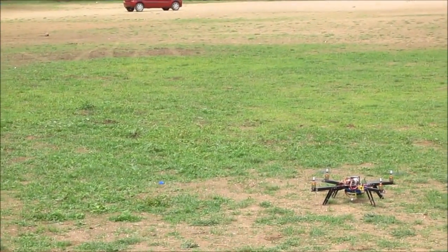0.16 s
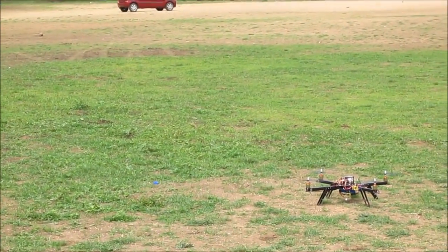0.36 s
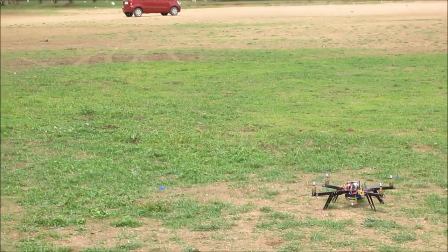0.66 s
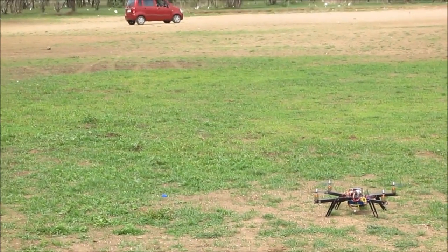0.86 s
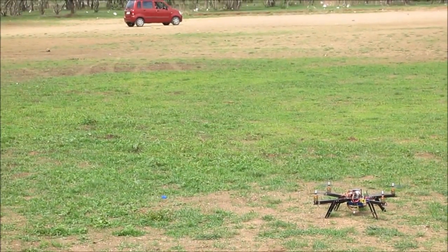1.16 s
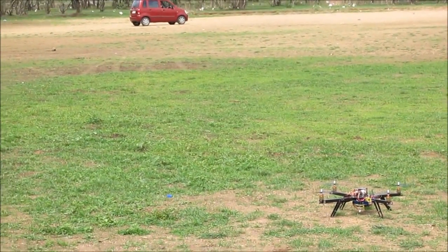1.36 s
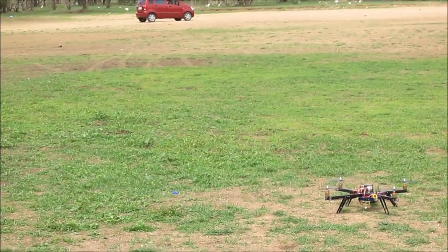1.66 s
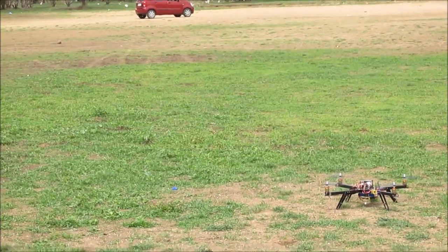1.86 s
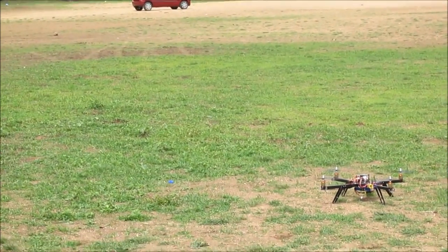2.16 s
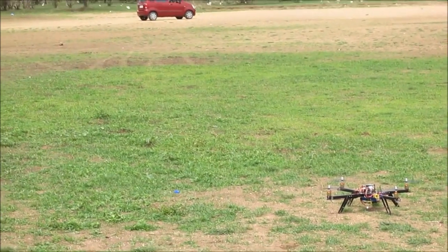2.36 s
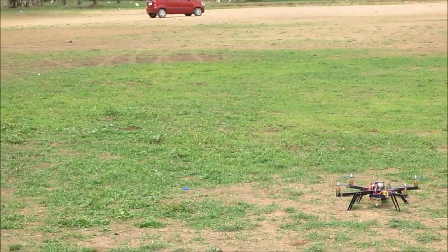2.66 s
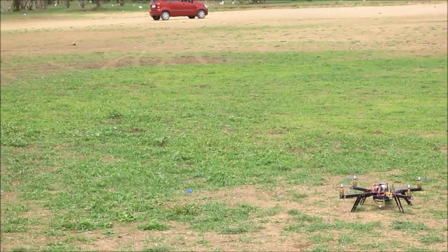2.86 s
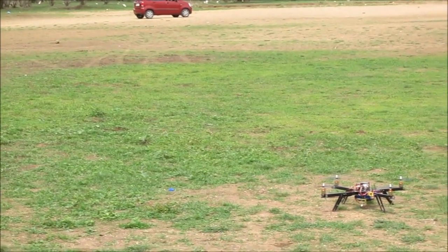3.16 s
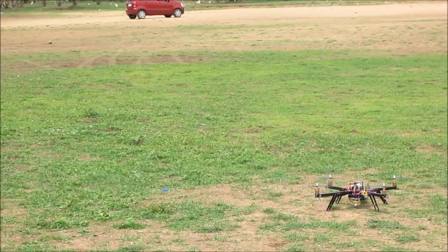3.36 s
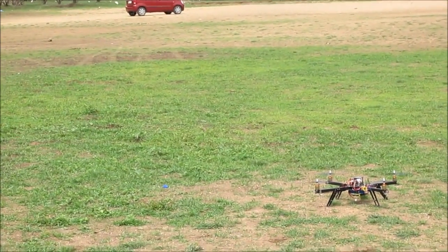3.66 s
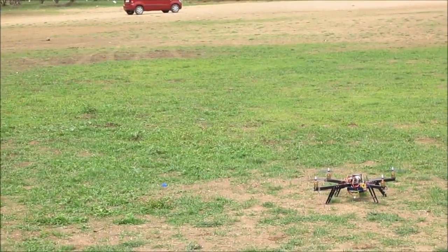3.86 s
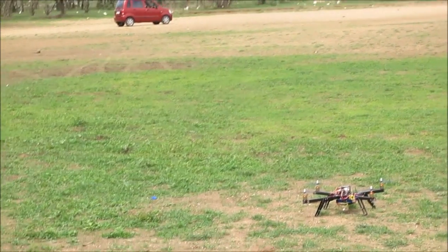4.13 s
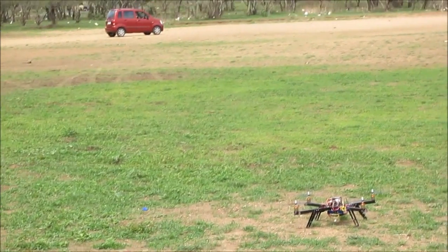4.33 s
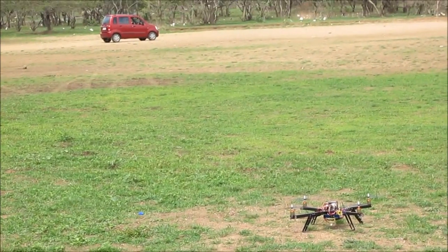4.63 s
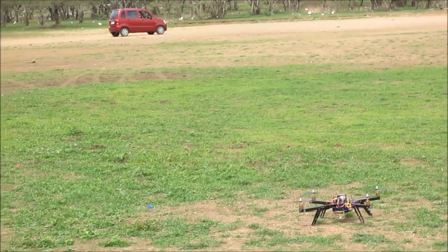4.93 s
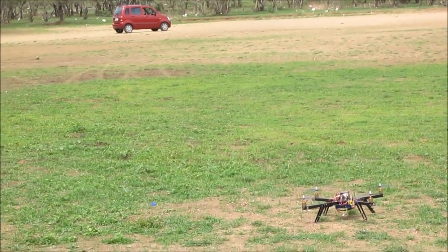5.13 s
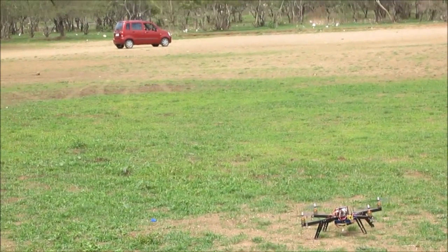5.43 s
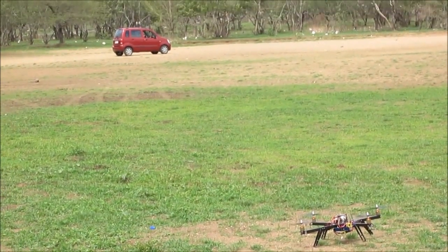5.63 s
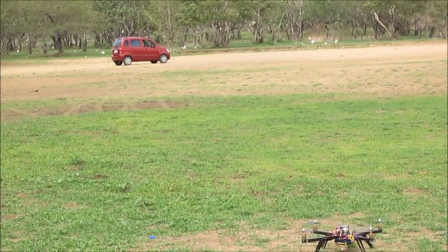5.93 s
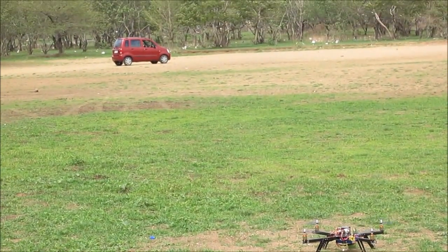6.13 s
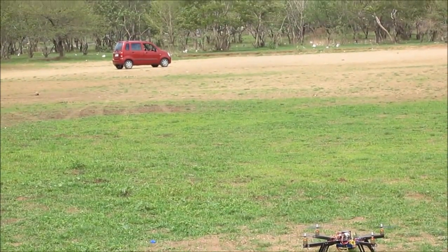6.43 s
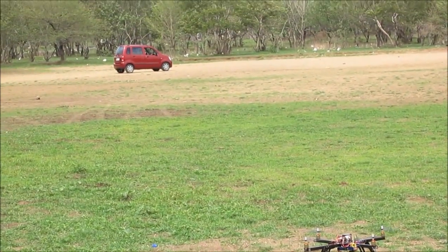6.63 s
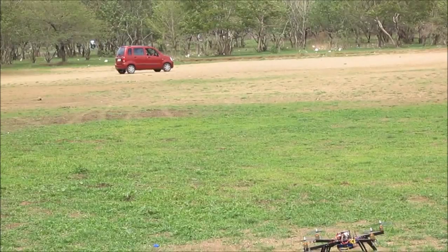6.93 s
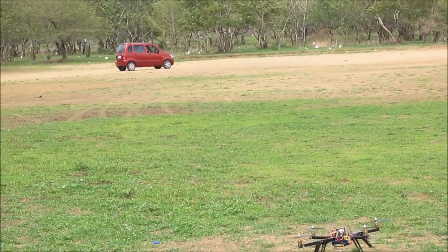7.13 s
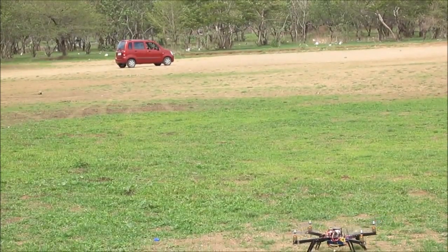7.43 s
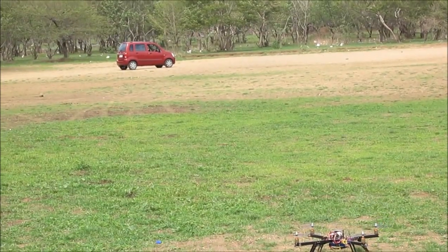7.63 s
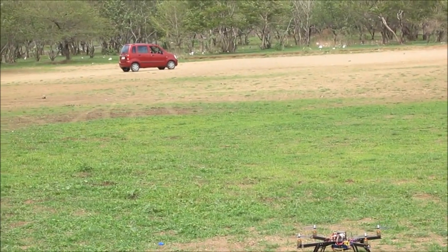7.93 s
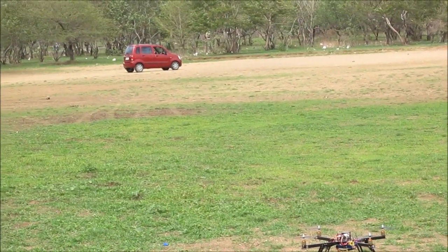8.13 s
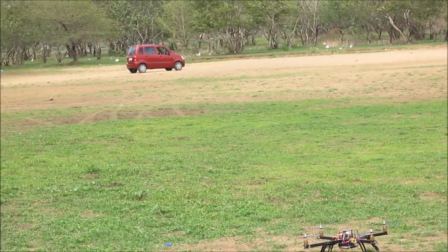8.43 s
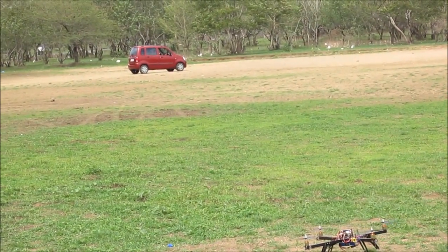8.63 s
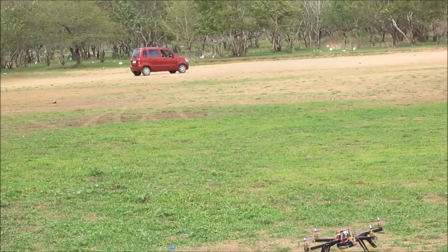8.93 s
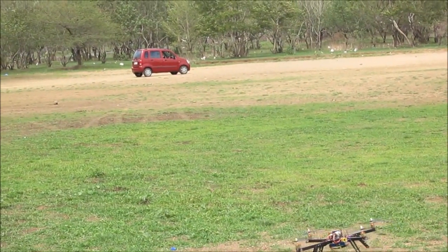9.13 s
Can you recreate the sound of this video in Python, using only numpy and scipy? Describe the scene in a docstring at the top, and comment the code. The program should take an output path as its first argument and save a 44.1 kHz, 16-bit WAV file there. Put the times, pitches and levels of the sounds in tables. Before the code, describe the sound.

In an open field, a small drone sits spinning its motors. Two thin high whines, not quite in tune, climb slowly over soft propeller hiss and a faint steadier higher electronic tone. They strengthen midway, waver, dip sharply late, then surge upward again. Wind hits the unshielded stereo microphone throughout, with deep uneven thumps, flutter and sharp little pops, heaviest in the first two seconds.

```python
"""Two brushless motors of a small multirotor whine at their commutation rate as they spin up on open grass.
Sine tones follow their pitch curves, mixed with the switching tone of the speed controllers, over propeller hiss
made of coloured noise. Gusts of low noise and kicks buffet two microphone ports, and short chirps pop on them.
Two faint low tones, airy swells and a brief treble rasp fill in; a gain control ducks after the loudest."""
import sys
import numpy as np
from scipy import signal
from scipy.fft import rfft, irfft, next_fast_len
from scipy.io import wavfile
from scipy.ndimage import uniform_filter1d

SR = 44100
rng = np.random.default_rng(int(sys.argv[2]) if len(sys.argv) > 2 else 0)


def file_out(sig):
    """Save sig as 16-bit WAV at sys.argv[1]."""
    # one column per channel
    cols = np.atleast_2d(sig).T
    # limit, then scale
    lim = np.clip(cols, -1, 1)
    pcm = np.round(lim * 32767).astype(np.int16)
    wavfile.write(sys.argv[1], SR, pcm)


N = 409644

# Motor pitch curves. Each row: time in seconds, commutation rate in Hz (before jitter).
NEAR_PITCH = [(0, 2740), (.5, 2847), (1.48, 2972), (2.01, 3015), (2.3, 2985), (2.72, 3030), (3.05, 3090),
              (3.2, 3160), (3.33, 3172), (3.47, 3110), (3.7, 3205), (3.97, 3161), (4.146, 3104),
              (4.24, 3165), (4.43, 3185), (4.78, 3273), (4.9, 3220), (5.05, 3198), (5.25, 3326),
              (5.58, 3153), (5.84, 3295), (6.02, 3100), (6.12, 3215), (6.18, 3065), (6.256, 3026),
              (6.42, 3250), (6.59, 3377), (6.735, 3406), (6.93, 3302), (7.05, 3272), (7.19, 3555),
              (7.25, 3490), (7.338, 3130), (7.423, 2743), (7.473, 2820), (7.518, 2680), (7.575, 2800),
              (7.6, 2950), (7.62, 2865), (7.722, 2843), (7.837, 3020), (8.196, 3248), (8.33, 3212),
              (8.57, 3189), (8.71, 3148), (8.9, 3360), (8.97, 3300), (9.03, 3390), (9.08, 3315),
              (9.21, 3545), (9.289, 3394)]
FAR_PITCH = [(0, 2351), (.92, 2502), (2.44, 2544), (2.69, 2620), (2.784, 2602), (3.13, 2700), (3.58, 2745),
             (3.88, 2758), (4.45, 2850), (4.67, 2797), (5.03, 2895), (5.51, 3010), (5.74, 3120),
             (5.85, 3110), (6.13, 2498), (6.575, 2910), (6.93, 3272), (7.11, 3360), (7.215, 3125),
             (7.303, 3227), (7.5, 2290), (7.6, 2280), (7.82, 2430), (8.12, 2701), (8.625, 2926),
             (8.98, 3398), (9.03, 3464), (9.08, 3470), (9.21, 3280), (9.289, 3384)]
# Pitch of the speed controllers' switching. Each row: time in seconds, frequency in Hz.
SWITCHING_PITCH = [(0, 7765), (1.4, 7759), (5.9, 7750), (6.15, 7762), (7.3, 7746), (7.55, 7768),
                   (9.29, 7742)]
# Level of the switching tone, beating slowly. Each row: time in seconds, level in dB before flicker.
SWITCHING_LEVEL = [(0, -45), (.28, -57.5), (1.35, -51), (1.84, -53), (2.21, -45), (2.63, -50.5),
                   (3.4, -41.5), (3.97, -50), (5.2, -50), (6.5, -41), (7.23, -49), (7.72, -38), (8.2, -42),
                   (8.39, -34.5), (8.69, -52), (8.86, -41), (9.28, -52)]
# Side tones of a motor. Each row: multiple of switching, multiple of the electrical rate (commutation / 6).
SIDE_TONES = [(0, 7), (0, 8), (0, 9), (0, 12), (0, 18), (1, -9), (1, -8), (1, -7), (1, -6), (1, -2), (1, 2),
              (1, 6)]
# Side tone levels, one for each row above: level in dB before load, frame and flicker.
NEAR_SIDE_DB = [-57.5, -56.5, -52, -63, -65, -54.5, -76, -65, -47.5, -59, -55.5, -59]
FAR_SIDE_DB = [-60, -76, -56.5, -55, -74, -57, -61, -55.5, -54, -64, -55, -53.5]
# How the frame radiates the side tones. Each row: frequency in Hz, gain in dB.
FRAME_GAIN = [(2800, -12), (3300, 2), (3600, -4.5), (3820, 5), (4050, 7), (4300, -1.5), (4550, -3.5),
              (4750, -14.5), (5500, -4), (6500, 1), (8800, 0), (10200, -6.5), (11100, 0)]
# The motor bell rings where the whine is loudest. Each row: whine in Hz, level in dB before trim and load.
BELL_RING = [(2300, -60), (2550, -44.5), (2750, -44), (2950, -45), (3080, -37.5), (3170, -31),
             (3240, -30.5), (3320, -36.5), (3420, -37.5), (3550, -41.5)]
# Motor load, heard as hiss. Each row: time in seconds, level in dB (each use adds its own offset).
LOAD_HISS = [(0, -53.5), (.5, -50), (1.6, -49), (2.1, -46.5), (2.6, -50), (3.03, -49.5), (4.2, -42),
             (5, -43), (5.3, -40.5), (6.2, -42), (6.7, -40.5), (7.2, -41.5), (7.35, -43), (8, -40.5),
             (8.6, -41), (8.92, -40), (9.289, -39)]
# Colour of the blade hiss. Each row: frequency in Hz, relative density in dB per Hz.
BLADE_COLOUR = [(180, -26), (300, -4.5), (470, -6.5), (900, -3.5), (2400, -5.5), (3200, -4), (3600, -5.5),
                (4000, -5.5), (5840, -9), (7500, -8), (8990, -3.5), (11000, -10), (13600, -17),
                (15800, -27)]
# Top of the hiss over its usual colour. Each row: time in seconds, gain in dB before wavering.
HISS_TOP = [(0, -1), (.3, -5), (.6, -3), (2.2, -2), (3.03, 8), (3.5, 3), (4.2, -0.5), (7.2, -1), (7.4, -6),
            (7.6, -7), (7.95, -5), (8.63, -3.5), (8.92, 1.5), (9.289, -2.5)]
# How far the top gain reaches down. Each row: frequency in Hz, share (held level beyond both ends).
TOP_REACH = [(8000, 0.26), (13000, 1)]
# Wind between the gusts. Each row: time in seconds, rumble level in dB before wavering.
BREEZE_LEVEL = [(0, -42), (.35, -39), (.95, -29), (1.15, -50), (1.5, -44), (1.62, -29.5), (1.85, -22),
                (2.05, -26), (2.2, -47), (2.33, -47), (2.5, -34.5), (2.8, -35), (3, -53), (3.9, -32),
                (4.35, -37.5), (4.65, -29), (5, -33), (5.5, -38.5), (5.85, -29), (6.08, -30), (6.22, -39.5),
                (6.42, -49.5), (6.65, -29), (7, -35.5), (7.68, -35), (8.3, -33.5), (8.7, -36.5),
                (9.289, -33)]
# Gusts. Each row: peak time in seconds, nominal rumble level in dB, width in seconds, flutter over rumble in dB.
GUST_EVENTS = [(0.034, -33, 0.012, 2.5), (.244, -36, 0.066, -0.5), (.43, -25, 0.095, -8.5),
               (.52, -20, 0.017, 5.5), (0.767, -29.5, 0.057, 1), (1.162, -35.5, 0.021, -9),
               (1.297, -35.5, 0.047, -5.5), (1.416, -27, 0.037, -13), (1.692, -15.5, 0.053, -0.5),
               (1.905, -20, 0.095, 0), (2.25, -41, 0.029, -24), (2.365, -23.5, 0.016, -6.5),
               (2.444, -25, 0.038, -6.5), (2.73, -31, 0.025, -8), (3.02, -32.5, 0.027, -27.5),
               (3.153, -24, 0.055, -13.5), (3.4, -28, 0.14, -13), (3.557, -22.5, 0.036, -6.5),
               (3.826, -22.5, 0.049, -13.5), (4.069, -26.5, 0.018, -24), (4.141, -21, 0.016, 4.5),
               (4.265, -25, .06, -21), (4.55, -19, 0.11, -8.5), (4.849, -18.5, 0.048, -6.5),
               (5.42, -27.5, 0.063, -17), (5.61, -29.5, .06, -19), (5.918, -14.5, 0.04, -2),
               (5.98, -21.5, 0.089, -12), (6.14, -29, 0.036, -13), (6.5, -29, 0.057, -13),
               (6.62, -26, 0.083, -23), (6.75, -26, 0.069, -10.5), (6.84, -33, 0.047, -14),
               (7.1, -30, 0.12, -14), (7.33, -32.5, .05, -9), (7.458, -31.5, 0.06, -10),
               (7.88, -24, 0.066, -11.5), (8.08, -26, 0.07, -11), (8.43, -22.5, .12, -22),
               (8.58, -24.5, 0.055, -14), (8.77, -33, 0.11, -19)]
# Colours of breeze rumble, gust body and flutter. Each row: frequency in Hz, relative level in dB
# (per Hz for the noises; for the flutter, a filter gain on the kicks).
RUMBLE_COLOUR = [(12, -47), (20, -20), (65, 3), (123, 5.5), (232, -3.5), (276, -15.5), (500, -32),
                 (650, -39), (1100, -120)]
THUMP_COLOUR = [(20, -18), (60, 0.5), (110, 5), (170, 3), (260, -4.5), (400, -19), (650, -55), (1100, -120)]
FLUTTER_COLOUR = [(150, -6), (280, 0), (450, -7.5), (800, -15), (1400, -29), (2500, -53)]
# Pops. Each row: onset in seconds, nominal level in dB before a 2.5 dB lift, starting pitch in Hz,
# crack over the cycles in dB before a 2.5 dB lift of its own, pan in dB added left and taken off right.
POP_EVENTS = [(0.142, -31.5, 1420, -1, -3), (0.436, -26, 655, -17, 9), (0.496, -20, 587, -22, 4),
              (0.518, -13, 850, -7, -7), (0.761, -14.5, 660, -7.5, 8), (0.966, -27.5, 505, -8.5, 6),
              (1.682, -12, 505, -19.5, -11), (1.791, -13, 684, -15, 7), (1.904, -6.5, 602, -12.5, -11.0),
              (1.949, -13, 488, -26, 2.5), (2.362, -34.5, 580, -22, 15), (3.558, -28, 700, -18, -8),
              (3.673, -27, 960, 3, -3.5), (4.134, -28, 510, -15, 1.5), (4.25, -27.5, 1034, -4, -5.5),
              (4.794, -21, 844, -16, -5), (4.84, -22.5, 519, -22.5, 15.5), (5.144, -35.5, 888, 9, -3.5),
              (5.905, -16.5, 540, -14, 14), (6.754, -22, 512, -18, 2)]
# Colour of the crack. Each row: frequency in Hz, relative level in dB per Hz.
CRACK_COLOUR = [(500, -16), (1000, 6.0), (1800, -8.0), (3000, -48.0), (5000, -50)]
# Wind fed across by the stereo circuit. Each row: frequency in Hz, share in the other channel (negative inverts).
PORT_CROSSFEED = [(50, 0.4), (90, .42), (170, 0.53), (350, 0.39), (700, -0.15), (1400, -0.1), (2500, 0.56)]
# Two faint low tones, perhaps the other motors; a list for each. Each row: time in seconds, pitch in Hz,
# level in dB, the last two before wavering.
LOW_TONES = [
    [(.6, 895, -77), (.9, 920, -63), (2.4, 892, -58), (3.2, 964, -74), (3.5, 965, -77)],
    [(2, 840, -81), (2.6, 876, -64), (3.4, 886, -58), (4.15, 869, -53), (5.4, 880, -56), (6, 869, -57),
     (6.8, 889, -51), (7.2, 874, -57), (8.2, 897, -57), (8.7, 882, -52.5), (9.29, 854, -56)],
]
# Soft airy swells in the midrange. Each row: time in seconds, level in dB.
AIRY_LEVEL = [(.8, -54), (1.1, -44.5), (1.6, -47), (2.2, -54), (8.9, -51), (9.15, -44), (9.29, -47)]
# Colour of those swells. Each row: frequency in Hz, relative level in dB per Hz.
AIRY_COLOUR = [(700, -11), (1300, 3.5), (1900, 5), (2600, -23)]
# A brief buzzing rasp in the treble. Each row: time in seconds, level in dB before chopping.
RASP_LEVEL = [(2.82, -56), (2.97, -41), (3.12, -47), (3.3, -44), (3.42, -54)]
# Bands of the rasp. Each row: centre in Hz, width in Hz, relative level in dB.
RASP_COLOUR = [(9650, 450, 0), (10900, 350, -4), (12250, 300, -4)]

WHINE_GROWS = 0.97  # dB of whine per dB of load
COAST_DB, COAST_HZ_PER_S = 8.5, 5100  # deepest fade of a whine as its motor coasts down; pitch slope that nears it
BREEZE_FLUTTER_DB, FLUTTER_GROWS = -12, 0.52  # over rumble at -37 dB; dB more per dB of breeze (stretched later)
GUST_RISE = 0.89  # a gust's rise time over its fall time
DUCK_OVER_DB, DUCK_SHARE, DUCK_MOST_DB = -8, 0.54, 5  # peak threshold; share of the excess taken off; limit
RECOVER_DB_PER_S = 8
TOP_HZ = 15790  # band limit


def amp(db):
    """Decibels to gain."""
    return 10 ** (np.asarray(db) / 20)


def unit(x):
    """Scale to rms 1."""
    return x / np.sqrt(np.mean(x ** 2) + 1e-20)


def along(points, hz):
    """Read (Hz, value) points on a log frequency axis, held level beyond the ends."""
    f, v = np.transpose(points)
    return np.interp(np.log(hz + 1), np.log(f + 1), v)


def curves(rows):
    """One value per sample for each column after the time."""
    s, *cols = np.transpose(rows)
    return [np.interp(np.arange(N) / SR, s, c) for c in cols]


def wobble(rate):
    """A random curve through rate knots a second, each of standard deviation 1."""
    knots = rng.standard_normal(int(N * rate / SR) + 2)
    return np.interp(np.arange(N) * rate / SR, np.arange(len(knots)), knots)


def filtered(x, response):
    """Filter x by a response given as a function of frequency."""
    m = next_fast_len(N + 8192)
    return irfft(rfft(x, m) * response(np.fft.rfftfreq(m, 1 / SR)), m)[..., :N]


def noise(spectrum, channels):
    """Coloured noise of rms 1."""
    white = rng.standard_normal((channels, N))
    return unit(filtered(white, lambda hz: amp(along(spectrum, hz))))


def tone(hz):
    """A sine of rms 1 that follows a pitch curve from a random phase."""
    return np.sqrt(2) * np.sin(2 * np.pi * (np.cumsum(hz) / SR + rng.random()))


def motor(rows, whine_db, side_db, overtones_grow, jitter_hz, flicker_db):
    """Six commutations per electrical turn shake the bell; the switching folds the harmonics around itself."""
    hz = uniform_filter1d(curves(rows)[0], size=500)
    switching_hz = curves(SWITCHING_PITCH)[0]
    load_db = curves(LOAD_HISS)[0] + 47
    # drive runs from -1 (coasting down) to 1 (driven up); the whine fades far more than it swells
    drive = np.tanh(uniform_filter1d(np.gradient(hz) * SR, size=1200) / COAST_HZ_PER_S)
    coast_db = COAST_DB * np.where(drive < 0, drive, 0.13 * drive)
    level_db = whine_db + along(BELL_RING, hz) + WHINE_GROWS * load_db + coast_db
    hz = hz + 7 * wobble(9) + jitter_hz * wobble(60)
    once_a_turn = 0.1 * tone(hz / 42)  # 42 commutations per shaft turn
    skirt = 0.12 * wobble(350)  # uneven commutation spreads a noisy skirt around the whine
    sound = amp(level_db + 0.28 * wobble(30)) * (1 + once_a_turn + skirt) * tone(hz)
    for (fold, multiple), tone_db in zip(SIDE_TONES, side_db):
        line_hz = fold * switching_hz + multiple * hz / 6
        growth = 0.85 if fold else overtones_grow  # the folded tones follow the load more closely
        line_db = tone_db + growth * load_db + 4.9 * np.minimum(drive, 0) + along(FRAME_GAIN, line_hz)
        sound += amp(line_db + flicker_db * wobble(11)) * tone(line_hz)
    return sound


def controllers():
    """Speed controllers sing at their switching rate, its octave, and sidebands one shaft turn to either side."""
    hz, hiss_db = curves(SWITCHING_PITCH)[0], curves(LOAD_HISS)[0]
    shaft_hz = 72 + 2 * wobble(4.3)
    lower = amp(-15.5 + 5.9 * wobble(20)) * tone(hz - shaft_hz)
    upper = amp(-29 + 3.44 * wobble(9.2)) * tone(hz + shaft_hz)
    octave = amp(-30 + 4 * wobble(15)) * tone(2 * hz)
    flicker_db = 3.6 * wobble(11)
    switching = amp(curves(SWITCHING_LEVEL)[0] + flicker_db) * tone(hz)
    return switching + amp(hiss_db) * (lower + upper + octave)


def propellers():
    """Blade hiss, nearly the same at both ports, swelling in soft patches; its top comes and goes."""
    hiss_db = curves(LOAD_HISS)[0]
    bright_db = curves(HISS_TOP)[0] + 2.9 * wobble(3.02)
    spectra = signal.stft(noise(BLADE_COLOUR, channels=2), nperseg=512)[2]
    # a random field smoothed over frequency, then time, makes the patches
    field = uniform_filter1d(rng.standard_normal(spectra.shape[1:]), size=9, axis=0)
    patches = amp(0.7 * unit(uniform_filter1d(field, size=12, axis=1)))
    pair = signal.istft(spectra * patches, nperseg=512)[1][:, :N]
    top = filtered(pair, lambda hz: along(TOP_REACH, hz))
    mid, side = pair + top * (amp(bright_db) - 1)
    low_side = filtered(side, lambda hz: 1 / (1 + (hz / 1600) ** 4))
    side = amp(-14.5) * side + amp(-21.5) * low_side  # the low part is more diffuse
    flutter_db = 0.9 * wobble(16)
    return amp(hiss_db + 7.0 + flutter_db) * np.array([mid + side, mid - side])


def wind():
    """Eddies strike each port on its own, in lumps; the stereo circuit feeds part of each port across."""
    breeze, gust, flutter_gain = gusts()
    lumps = np.array([wobble(25), wobble(25)])
    # small eddies burst one by one: sparse kicks of widely scattered size over a little steady noise
    struck = rng.random((2, N)) < 200 / SR  # 200 kicks a second on average
    sizes = amp(6.6 * np.clip(rng.standard_normal((2, N)), -2, 2))
    kicks = unit(struck * sizes * rng.choice([-1, 1], size=(2, N)))
    kicks = kicks + 0.16 * rng.standard_normal((2, N))
    thump = noise(THUMP_COLOUR, channels=2)
    # levelled by its own short-term power, so each gust keeps close to its listed strength
    thump = thump / np.sqrt(np.abs(uniform_filter1d(thump ** 2, size=1300)) + 0.05)
    breeze_rumble = breeze * unit(amp(4.6 * lumps) * noise(RUMBLE_COLOUR, channels=2))
    gust_rumble = gust * amp(2.7 * lumps) * thump
    flutter_lumps_db = 3 * lumps
    coloured_kicks = filtered(kicks, lambda hz: amp(along(FLUTTER_COLOUR, hz)))
    flutter = flutter_gain * unit(amp(flutter_lumps_db) * coloured_kicks)
    ports = breeze_rumble + gust_rumble + flutter + pops()
    return ports + filtered(ports[::-1], lambda hz: along(PORT_CROSSFEED, hz))


def gusts():
    """Gains of breeze, gusts and flutter: the breeze wavers, each gust swells and drops as a pointed hump."""
    breeze_db = curves(BREEZE_LEVEL)[0] + 3.1 * wobble(12)
    flutter_db = breeze_db + BREEZE_FLUTTER_DB + FLUTTER_GROWS * (breeze_db + 37) + 2.7 * wobble(14)
    flutter_power = amp(2.064 * flutter_db)  # twice the dB for power, stretched by 1.032
    gust_power, t = np.zeros(N), np.arange(N) / SR
    for s, db, width_s, over_rumble_db in GUST_EVENTS:
        near = slice(max(round((s - 0.4) * SR), 0), round((s + 0.4) * SR))
        u = (t[near] - s) / width_s
        power = amp(2 * db - 22.5 * np.where(u < 0, -u / GUST_RISE, u))  # falls 11.25 dB in one width
        gust_power[near] += power
        flutter_power[near] += power * amp(2 * over_rumble_db)
    return amp(breeze_db), np.sqrt(gust_power), np.sqrt(flutter_power)


def pops():
    """The strongest eddies snap, mostly on one port: a few quick falling cycles with a crack of noise."""
    ports, t = np.zeros((2, N + SR)), np.arange(SR // 20) / SR
    crackle = noise(CRACK_COLOUR, channels=1)[0]
    for (s, db, hz, crack_db, pan_db), phase in zip(POP_EVENTS, rng.random((len(POP_EVENTS), 2))):
        at = round(s * SR)
        shape = (1 - np.exp(-t / 0.0012)) * amp(-60 * t / 0.021)  # falls 60 dB in 21 ms
        cycles = np.sin(2 * np.pi * (hz * t * (1 - 8 * t) + phase[:, None]))
        crack = amp(crack_db + 2.5 - 60 * t / 0.089) * crackle[at:at + len(t)]
        port_gain = amp(db + 2.5 + pan_db * np.array([[1], [-1]]))
        ports[:, at:at + len(t)] += port_gain * shape * (cycles + crack)
    return ports[:, :N]


def hum():
    """Low tones, slightly unsteady in pitch and level."""
    return sum(amp(db + 2.4 * wobble(11)) * tone(hz + 2.36 * wobble(10)) for hz, db in map(curves, LOW_TONES))


def airy():
    """Diffuse noise, perhaps a gust in far trees, unlike at the two ports."""
    return amp(curves(AIRY_LEVEL)[0]) * noise(AIRY_COLOUR, channels=2)


def rasp():
    """Narrow resonant bands of noise, chopped unevenly."""
    def bands(hz):
        return sum(amp(db) * w * w / (w * w + (2 * (hz - centre)) ** 2) for centre, w, db in RASP_COLOUR)

    fade_in, fade_out = (RASP_LEVEL[0][0] - 0.05, -90), (RASP_LEVEL[-1][0] + 0.05, -90)
    level_db = curves([fade_in] + list(RASP_LEVEL) + [fade_out])[0]
    return amp(level_db + 2.3 * wobble(70)) * unit(filtered(rng.standard_normal(N), bands))


def scene():
    """The drone sits near the centre; the wind is at the ports."""
    near = motor(NEAR_PITCH, 0.28, NEAR_SIDE_DB, overtones_grow=0.59, jitter_hz=3, flicker_db=2.5)
    far = motor(FAR_PITCH, -4.0, FAR_SIDE_DB, overtones_grow=0.1, jitter_hz=2.9, flicker_db=3.5)
    # pairs of gains in dB: left, right
    drone = near * amp([[-1.1], [1.1]]) + far * amp([[0.4], [-0.4]])
    drone = drone + (controllers() + rasp()) * amp([[0.6], [-0.6]])
    return drone + hum() + propellers() + airy() + wind()


def record(dry):
    """Gain control ducks after the loudest peaks, which also round off at a ceiling; the top is cut off."""
    level_db = 20 * np.log10(np.abs(dry).max(axis=0) + 1e-9)
    wanted_db = np.clip(DUCK_SHARE * (level_db - DUCK_OVER_DB), 0, DUCK_MOST_DB)
    # a running maximum against a rising ramp holds each duck and releases it steadily
    ramp_db = RECOVER_DB_PER_S * np.arange(N) / SR
    duck_db = np.maximum.accumulate(wanted_db + ramp_db) - ramp_db
    ducked = dry * amp(-uniform_filter1d(duck_db, size=200, origin=99))  # eases in just after the peak
    rounded = ducked / (1 + np.abs(ducked / 0.9) ** 4) ** 0.25
    return filtered(rounded, lambda hz: hz < TOP_HZ)


dry = scene()
out = record(dry)
file_out(out)
```